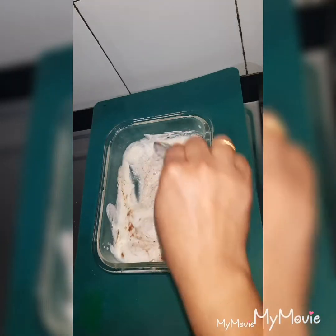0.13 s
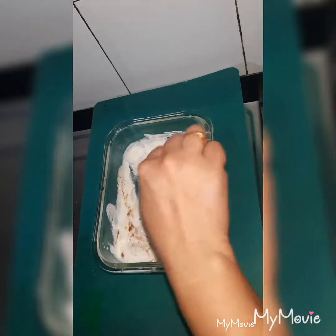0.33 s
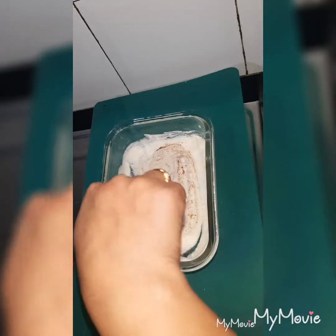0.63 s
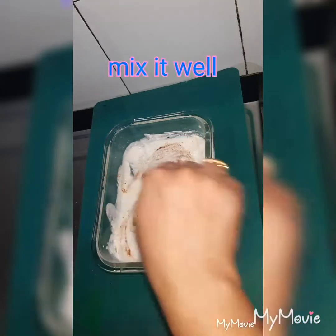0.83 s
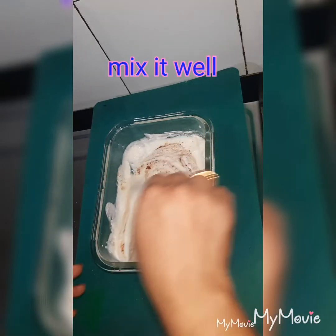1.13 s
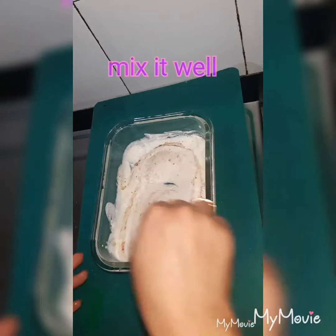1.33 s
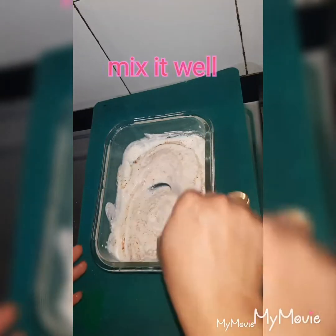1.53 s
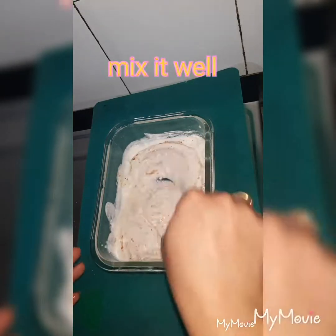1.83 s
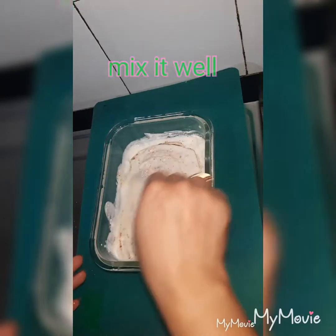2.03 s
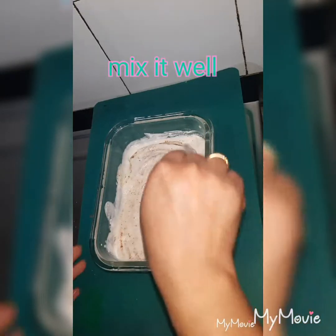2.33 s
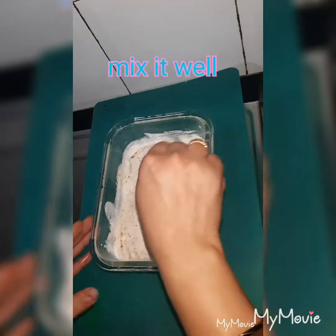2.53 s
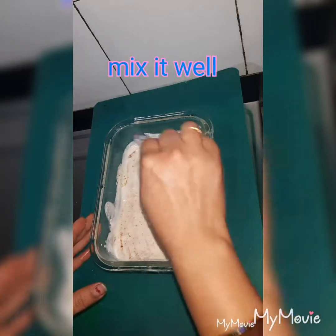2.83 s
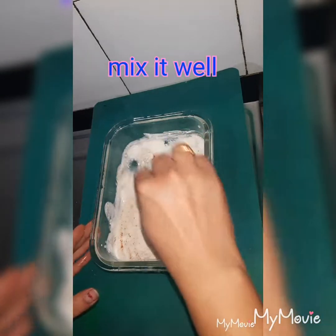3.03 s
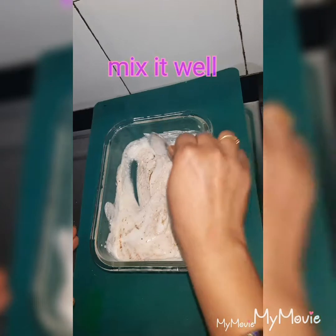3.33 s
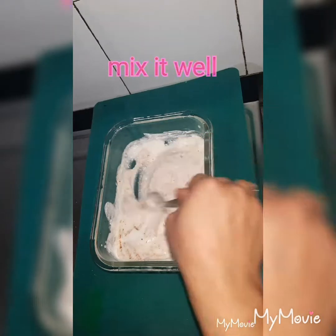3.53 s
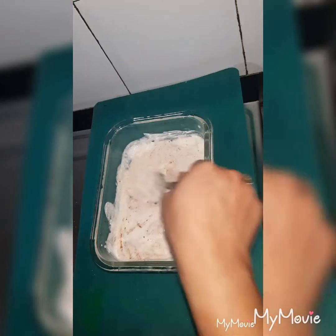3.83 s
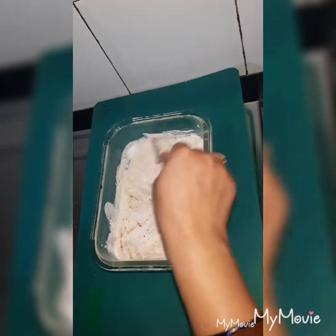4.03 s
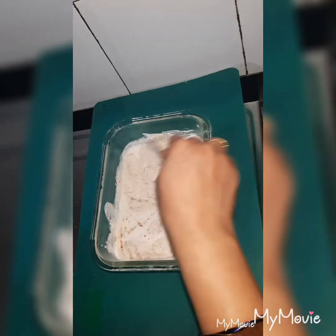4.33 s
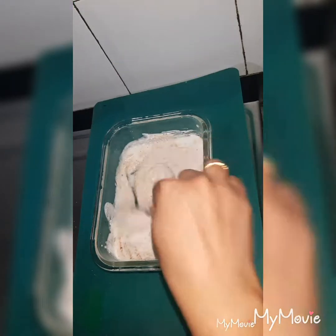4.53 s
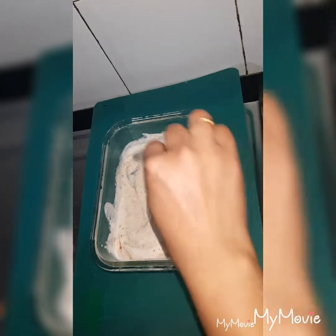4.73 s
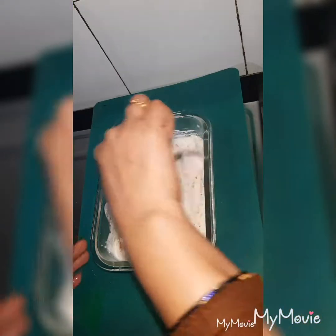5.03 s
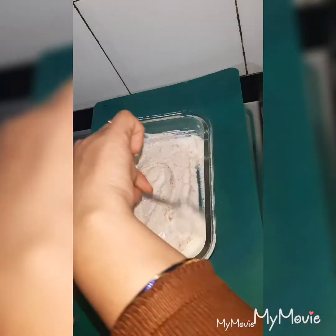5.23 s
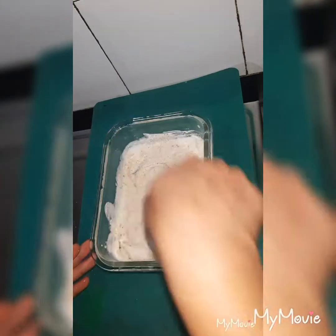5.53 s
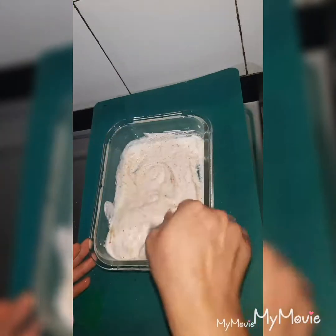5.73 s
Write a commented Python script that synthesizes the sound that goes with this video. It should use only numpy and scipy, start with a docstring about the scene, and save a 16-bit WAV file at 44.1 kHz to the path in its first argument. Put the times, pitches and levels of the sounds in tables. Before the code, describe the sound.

A metal spoon stirs thick yogurt in a glass dish, knocking its sides and base with short, damped clinks in a quiet small kitchen.

```python
"""In a small kitchen, a steel spoon stirs thick yogurt in a glass dish on a table and knocks its walls and base.
Each knock is a contact plus a few ms of chatter; it drives damped glass and steel modes and a bare crack.
The room answers with a short tail of decaying noise bands. Under it lies shaped noise: a low rumble that surges
into a thump at the end, a drone, faint hiss, soft grainy swells between and around the knocks, and wet smacks.
A sine makes a thin whine."""
import sys
import numpy as np
from scipy import signal
from scipy.fft import rfft, irfft
from scipy.io import wavfile
from scipy.ndimage import uniform_filter1d

SR = 44100
rng = np.random.default_rng(int(sys.argv[2]) if len(sys.argv) > 2 else 0)


def persist_wave(psi):
    """Save psi, clipped to +-1, as 16-bit WAV."""
    counts = np.round(np.clip(psi, -1, 1) * 32767).astype(np.int16)
    wavfile.write(sys.argv[1], SR, np.atleast_2d(counts).T)


N = 260094
RUN_IN = SR   # samples ahead of the scene, for knocks that still ring at its start

WALL, LIP, FLOOR, CORNER, FAR = range(5)   # struck spots of the dish
HISS_DB, WHINE_HZ, WHINE_DB = -85, 15625, -90
KITCHEN_DB, LATE_DB, LATE_STRETCH = -17, -17.5, 1.65   # tail; its fainter part, slower by the stretch
MOST_CYCLES = 85   # the yogurt damps the glass: t60 limit before the spot's freedom scales it
STRENGTH_SPREAD_DB, PITCH_SPREAD = 3.5, 0.007   # each knock meets the modes differently (pitch: ratio)
FLUTTER_DEPTH, FLUTTER_PER_S = 1.5, 120   # the moving spoon and yogurt shake every ring
FIRST_CONTACT, CHATTER = 0.76, 0.9   # shares of the push
CRACK_DB, CRACK_GROWS = 34.5, 0.18   # growth in dB per dB of knock level: weak touches are soft
STEEL_DB = 8
FAVOUR_Q = 6.94
BASE_HZ, THUMP_HZ, THUMP_DB = 810, 202, -1   # tops of the dish-base and table-top bands; thump re base
CREST_DB = 11.5   # nominal peak of a knock above its loudest 3 ms


def amp(db):
    """dB to gain."""
    return 10 ** (np.asarray(db) / 20)


def rms_one(x):
    """Scale to rms 1."""
    return x / np.sqrt(np.mean(x ** 2) + 1e-20)


def at_hz(points_hz, values, hz):
    """Straight lines on a log-frequency axis."""
    return np.interp(np.log(np.maximum(hz, 1)), np.log(points_hz), values)


def coloured(x, points_hz, db):
    """Shape a signal by a spectrum in dB."""
    bins_hz = np.fft.rfftfreq(len(x), 1 / SR)
    return irfft(rfft(x) * amp(at_hz(points_hz, db, bins_hz)), len(x))


def shaped_noise(spectrum):
    """Noise with a given spectrum, rms 1."""
    return rms_one(coloured(rng.standard_normal(N), *np.transpose(spectrum)))


def drift(knots_per_s):
    """Random wander: lines between normal knots of spread 1."""
    knots = int(N / SR * knots_per_s) + 2
    return np.interp(np.arange(N) / SR * knots_per_s, np.arange(knots), rng.standard_normal(knots))


def passed(x, hz, kind, order):
    """Butterworth filter."""
    return signal.sosfilt(signal.butter(order, hz, kind, fs=SR, output="sos"), x)


def lifted(x, hz, db):
    """Peaking filter: a resonance raised, or cut, by the given dB."""
    w, top = 2 * np.pi * hz / SR, amp(db / 2)
    wide = np.sin(w) / (2 * FAVOUR_Q)
    zeros = [1 + wide * top, -2 * np.cos(w), 1 - wide * top]
    poles = [1 + wide / top, -2 * np.cos(w), 1 - wide / top]
    return signal.lfilter(zeros, poles, x)


def rumble(t):
    """Low noise of wavering level, surging into a thump at the end."""
    # (frequency [Hz], relative density [dB])
    spectrum = [(15, -85.5), (25, -26.5), (48, -33), (63, -18), (91, -0.5), (156, -14), (266, -18),
                (328, -24.5), (362, -34.5), (440, -22.5), (598, -37.5), (775, -40), (1200, -58),
                (1560, -95.5), (2640, -120)]
    # (time [s], level [dB])
    level = [(0, -73.5), (.5, -70.5), (1.1, -65), (2.2, -62.5), (3.0, -62.5), (3.3, -67), (3.9, -60.5),
             (4.5, -66), (5.3, -65.5), (5.6, -67.5), (5.84, -68), (5.9, -43)]
    return amp(np.interp(t, *np.transpose(level)) + 2.5 * drift(14.0)) * shaped_noise(spectrum)


def drone(t):
    """Faint noise peaked near 780 Hz, of wavering level."""
    # (frequency [Hz], relative density [dB])
    spectrum = [(400, -33.5), (600, -19), (780, 6.5), (900, -4.5), (1200, -20)]
    # (time [s], level [dB])
    level = [(0, -110), (.6, -91.5), (1.5, -80.5), (2.2, -74), (2.9, -77.5), (3.2, -81.5), (3.7, -80),
             (4.2, -79), (4.5, -68), (4.8, -83), (5.9, -86)]
    return amp(np.interp(t, *np.transpose(level)) + 3.0 * drift(6.0)) * shaped_noise(spectrum)


def hiss():
    """Steady shaped noise."""
    # (frequency [Hz], relative density [dB])
    spectrum = [(500, -5.5), (1000, -1), (2000, -11), (4000, -12), (7000, -14), (11000, -15.5),
                (15300, -9.5), (15800, -40.5)]
    return amp(HISS_DB) * shaped_noise(spectrum)


def whine(t):
    """Thin high sine, its level drifting slightly."""
    return amp(WHINE_DB + 3.0 * drift(3.0)) * np.sin(2 * np.pi * WHINE_HZ * t)


def grainy_swells(t):
    """Soft hiss swelling between and around knocks: noise under bell curves, grainy by fast level drift."""
    # (frequency [Hz], relative density [dB])
    spectrum = [(530, -41.5), (900, -12.5), (1800, -3.5), (2900, -5), (4700, -7), (6400, -17),
                (9000, -14.5), (12000, -19), (15500, -20)]
    # (middle [s], full width at 1/e [s], level [dB])
    swell_table = [(.92, 0.36, -78), (1.427, 0.39, -72), (1.9, 0.28, -70), (2.452, 0.19, -71),
                   (2.853, 0.75, -72), (3.45, .3, -80), (4.262, 0.25, -88), (4.78, .3, -74),
                   (5.143, 0.13, -73), (5.42, .25, -72.5)]
    swells = sum(amp(db) * np.exp(-(2 * (t - mid_s) / length_s) ** 2) for mid_s, length_s, db in swell_table)
    return swells * amp(1.9 * drift(210.0)) * shaped_noise(spectrum)


def background():
    """Sum of the sounds that bypass the room tail."""
    t = np.arange(N) / SR
    return rumble(t) + drone(t) + grainy_swells(t) + hiss() + whine(t)


def kitchen(x):
    """Dense reflections: noise that swells over 2 ms and dies band by band."""
    # (frequency [Hz], t60 of the main part [s], relative level [dB])
    decays = [(250, 0.23, -10), (575, 0.24, -14.5), (1500, 0.2, -17), (3750, 0.23, -19), (8000, 0.23, -22),
              (11000, .2, -15.5), (15000, 0.057, -11.5)]
    t = np.arange(int(0.7 * SR)) / SR
    hz, t60_s, db = np.transpose(decays)
    tail = np.zeros(len(t))
    edges_hz = 150 * 2 ** np.arange(0, 7.1, 0.5)
    for low, high in zip(edges_hz, edges_hz[1:]):
        mid = np.sqrt(low * high)
        band = passed(rng.standard_normal(len(t)), [low, high], "band", order=2)
        decay_db = -60 * t / at_hz(hz, t60_s, mid)
        decay = amp(decay_db) + amp(LATE_DB + decay_db / LATE_STRETCH)
        tail += band * amp(at_hz(hz, db, mid)) * decay
    tail *= np.minimum(t / 0.002, 1) * amp(KITCHEN_DB)
    return signal.fftconvolve(x, tail)[:len(x)]


def smacks():
    """Soft wet smacks and grit under the spoon: short grainy noise puffs, each in its own band."""
    # (time [s], level before envelope [dB], nominal centre [Hz], nominal width [octaves], time scale [s])
    puffs = [(1.935, -46.5, 8000, 2.1, 0.007), (2.489, -60.5, 5940, 1.2, 0.0068),
             (2.513, -60.5, 4800, 0.52, 0.016), (2.538, -60, 5400, 1.2, 0.008),
             (2.572, -57, 1000, .3, 0.0097), (4.672, -60, 4960, 0.98, 0.012),
             (4.816, -63.5, 4500, 2.1, 0.023), (5.136, -76, 7500, 0.89, 0.016),
             (5.161, -66.5, 1500, 0.25, 0.0096), (5.165, -69, 8000, .5, 0.012),
             (5.453, -63, 9570, 0.75, 0.01)]
    out = np.zeros(N)
    for (s, db, hz, octaves, length_s), draw in zip(puffs, rng.standard_normal((len(puffs), 4096))):
        t = np.arange(4096) / SR / length_s
        edges_hz = np.minimum(hz * 2 ** (octaves * np.array([-0.5, 0.5])), 16000)
        band = passed(draw * np.abs(draw), edges_hz, "band", order=2)
        envelope = np.minimum(6.0 * t, 1) * np.exp(-1.5 * t)
        at = round(s * SR)
        out[at:at + 4096] += amp(db) * rms_one(band) * envelope
    return out


def rings(modes, db, t, freedom, draw):
    """Sum of damped sines, each fluttering in strength; freedom scales t60."""
    hz, level_db, t60_s = modes
    knots = draw[:len(hz) * 64].reshape(len(hz), 64)
    wander = np.array([np.interp(t * FLUTTER_PER_S, np.arange(64) + 1, k, left=0) for k in knots])
    decay = amp(-60 * t / (t60_s * freedom)[:, None])
    waves = (1 + FLUTTER_DEPTH * wander) * decay * np.sin(2 * np.pi * hz[:, None] * t)
    return amp(level_db + db) @ waves


def glass(t, colour_hz, colour_db, freedom, draw):
    """Yogurt-damped modes of the dish; the uneven load shifts their pitches."""
    # (frequency [Hz], level [dB], t60 before limit and freedom [s])
    dish_modes = [(386.4, -12, 0.17), (634.7, -16, 0.29), (838, -22, 0.1), (1120, -14, 0.028),
                  (1290, -10.5, 0.038), (1500, -7.5, 0.013), (1928, -27.5, 0.064), (1843.5, -21.5, 0.21),
                  (2007, -7.5, 0.055), (2007, -12.5, 0.04), (2281, -8, 0.27), (2414, -18.5, 0.083),
                  (2724, -10, 0.055), (2900, -6.5, 0.12), (3190, -10.5, 0.054), (3616, -15.5, 0.21),
                  (3880, -19, 0.15), (4140, -13, 0.012), (4620, -9.5, 0.013), (4810, -8.5, 0.11),
                  (5260, -7.5, 0.06), (6050, -17.5, 0.09), (7060, -24.5, 0.017), (8200, -5.5, 0.075),
                  (8860, -13, .025), (9400, -16.5, 0.013), (9880, -18.5, 0.053), (12100, -30, 0.0067),
                  (13700, -22, 0.018)]
    hz, db, t60_s = np.transpose(dish_modes)
    count = len(hz)
    spot_db = at_hz(colour_hz, colour_db, hz) + STRENGTH_SPREAD_DB * draw[:count]
    loaded_hz = hz * (1 + PITCH_SPREAD * draw[count:2 * count])
    modes = loaded_hz, db, np.minimum(t60_s, MOST_CYCLES / hz)
    return rings(modes, spot_db, t, np.clip(freedom, 0.1, 1.3), draw[100:])


def steel_ring(t, colour_hz, colour_db, steel_db, draw):
    """Faint modes of the spoon."""
    # (frequency [Hz], relative level [dB], t60 before freedom 0.8 [s])
    steel_modes = [(629, -30, .3), (1265, -38, .25), (1865, -37, .3), (1985, -35, .3), (2252, -31, .25),
                   (3545, -39, .55), (4705, -40, .3)]
    modes = np.transpose(steel_modes)
    return rings(modes, at_hz(colour_hz, colour_db, modes[0]) + steel_db, t, 0.8, draw[2100:])


def bare_crack(chatter, colour_hz, colour_db):
    """Contact noise without modes: chatter through a short spectral filter."""
    # (frequency [Hz], relative level [dB])
    spectrum = [(400, -43), (1000, -8), (2500, -3), (5000, -4), (9000, -16.5), (15000, -25.5)]
    hz, db = np.transpose(spectrum)
    gains = amp(2 * (db + at_hz(colour_hz, colour_db, hz)))   # doubled dB: minimum_phase halves it
    linear = signal.firwin2(255, np.r_[0, hz, SR / 2], np.r_[0, gains, 0] + 1e-6, fs=SR)
    return signal.fftconvolve(chatter, signal.minimum_phase(linear))


def knock(force_db, base_db, colour_db, chatter_s, freedom, steel_db, favoured, draw):
    """A sharp contact and tiny chatter drive the modes and a crack; the loudest 3 ms get rms 1."""
    # frequencies where wall, reference, rim, edge and tick levels act [Hz]
    colour_hz = [1250, 2100, 3600, 5000, 9500]
    t = np.arange(int(0.5 * SR)) / SR
    body = glass(t, colour_hz, colour_db, freedom, draw)
    steel = steel_ring(t, colour_hz, colour_db, steel_db, draw)

    short = t[:1024]
    envelope = np.exp(-short / max(chatter_s, 1e-4)) * np.minimum(short / 0.0026, 1)
    chatter = draw[-1024:] * np.abs(draw[-1024:]) * envelope
    chatter /= np.sqrt(np.sum(chatter ** 2))
    blow = CHATTER * chatter + FIRST_CONTACT * (np.arange(len(short)) == 40)

    sound = signal.fftconvolve(blow, body)
    crack = bare_crack(chatter, colour_hz, colour_db)
    sound[:len(crack)] += amp(CRACK_DB + CRACK_GROWS * force_db) * crack
    for spot_hz, lift_db in favoured:
        sound = lifted(sound, spot_hz, lift_db)
    sound += amp(STEEL_DB) * signal.fftconvolve(blow, steel)

    base = passed(sound, [350, BASE_HZ], "band", order=3)
    base += amp(THUMP_DB) * passed(sound, [80, THUMP_HZ], "band", order=2)
    sound = passed(sound, BASE_HZ, "high", order=4) + amp(base_db) * base
    return sound / np.sqrt(np.max(uniform_filter1d(sound ** 2, size=128)))


def spoon():
    """All knocks in place, dealt in turn to six paths into the room; smacks join the first."""
    # (time [s], nominal peak [dB], spot, weight added to base and wall [dB],
    #  brightness added to rim, edge and tick [dB], clarity scaling the favoured lifts,
    #  own note [Hz], note lift [dB], steel ring before STEEL_DB [dB])
    knocks = [(-0.1, -23.5, WALL, -4, -5, 0.53, 2230, 10.5, -12),
              (0.2787, -27, WALL, 1, -0.5, 0.81, 3840, 10, 7),
              (0.3515, -22.5, WALL, 3.5, -3, 0.95, 1935, 9, -2.5),
              (0.7284, -20, WALL, 3.5, 2, 2.03, 8000, 16.5, 6),
              (0.7637, -6.5, LIP, 1.5, -0.5, 0.43, 1130, -2, -14.5),
              (0.8091, -21.5, WALL, -6.5, -0.5, 1.14, 2310, 9.5, 2),
              (1.2339, -10, LIP, 4.5, 5, 1.1, 2613, 12.5, 4),
              (1.3103, -12.5, LIP, -0.5, -5, 1.24, 2250, 2.5, 1),
              (1.5648, -45.5, FAR, 2, -6, .8, 1040, 13.5, 6),
              (1.697, -5.5, LIP, -1.5, -5.5, 0.18, 5260, 10, 5.5),
              (1.8126, -17, FLOOR, 1.5, -3, 1.5, 2100, 2.5, -15),
              (1.9473, -17.5, FAR, -2.5, -5.5, 0.4, 3360, 6, -6),
              (2.1002, -7.5, FLOOR, -1, 1, 1.22, 2130, 9, -16),
              (2.2412, -27.5, FAR, -5.5, -4, 0.25, 2330, 15, -13),
              (2.305, -39.5, FAR, -3, -1, .8, 990, 12, -15),
              (2.3702, -16, FLOOR, -5.5, 0.5, 1.54, 4810, 5.5, -17),
              (2.5945, -17.5, FAR, 2.5, 3.5, 2.2, 1750, 12.5, 4.5),
              (2.6831, -13, CORNER, -2, -4, 0.87, 2200, 3.5, -28),
              (2.829, -33.5, CORNER, 3, 8, 2.1, 1900, 1, -2),
              (2.9026, -38.5, FAR, 4.5, -5, 1.4, 905, 12.5, -9),
              (2.9904, -15.5, CORNER, -0.5, -1.5, 1.1, 2900, 10, -13),
              (3.3539, -19.5, WALL, 0.5, 2, 1, 2720, 10, -8.5),
              (3.4491, -36.5, FLOOR, 7.5, -5.5, 0.32, 2790, 9, 0),
              (3.8575, -5.5, LIP, 2.5, -3, 1.9, 752, 9, 8.5),
              (4.2495, -45.5, FAR, -11, 23.5, 0.24, 4490, 5, -4),
              (4.3317, -14.5, WALL, 4.5, 11.5, 0.76, 3520, 7, -2.5),
              (4.5464, -28, FAR, -0.5, -0.5, 1.07, 1560, 12.5, -4),
              (4.7424, -34, FLOOR, 4, 9, 1.4, 1454, 9.5, -11),
              (4.8984, -5, FLOOR, -2, 6, 0.9, 2800, 11.5, 2.5),
              (4.998, -17.5, FLOOR, 3.5, -0.5, 0.29, 1984, 16, -17),
              (5.1036, -44, FLOOR, 3, -5, 1.0, 2210, 4, -3),
              (5.2354, -27.5, FAR, -5, -2, 0.74, 2350, 6.5, -12),
              (5.3025, -4, LIP, 0, -4, .6, 4960, 10.5, -13),
              (5.3413, -15.5, WALL, -0.5, 0.5, 1, 4900, -3, -2.5),
              (5.7875, -14, WALL, 4, -1, 1.1, 3750, 7.5, -3.5),
              (5.8704, -3.5, LIP, 4, 15.5, 1.23, 2275, 4.5, 9),
              (5.8844, -2, LIP, 0, 13, 2.7, 2245, 29, -15)]
    # per spot: (base [dB], wall [dB], rim [dB], edge [dB], tick [dB], chatter decay [s], freedom to ring)
    spots = [(-6, -0.5, 2, 1.5, -2.5, 0.0072, 0.78), (-9.5, -3.5, -1.5, 1.5, 1.5, .004, .95),
             (-10, -6, -16, -10, -6.5, 0.0033, 0.18), (-21.5, -2.5, -30.5, -10, -3, 0.0053, 0.33),
             (-5.5, 1.5, -4.5, -2, 2, 0.0073, 0.28)]
    # resonances per spot: (frequency [Hz], lift before clarity [dB])
    spot_resonances = [
        [(1030, 6), (1900, 4), (3780, 8.5), (4600, 4)],
        [(1265, 4.5), (1900, 4.5), (3560, 12.5), (4700, 0)],
        [(1540, 8.5), (2120, 8.5), (2900, -1.5), (4750, 3.5)],
        [(1490, 8), (1800, 3.5), (3200, 9), (4980, 9.5)],
        [(1060, 6), (2030, 8), (3000, 4.5), (5000, 5.5)],
    ]
    out = np.zeros((6, N + 2 * SR))
    draws = rng.standard_normal((len(knocks), 3600))
    for k, (s, db, spot, weight_db, bright_db, clarity, note_hz, note_db, ring_db) in enumerate(knocks):
        base, wall, rim, edge, tick, chatter_s, freedom = spots[spot]
        colour_db = [wall + weight_db, 0, rim + bright_db, edge + bright_db, tick + bright_db]
        favoured = [(hz, clarity * lift_db) for hz, lift_db in spot_resonances[spot]]
        favoured.append((note_hz, note_db))
        sound = knock(db, base + weight_db, colour_db, chatter_s, freedom, ring_db, favoured, draws[k])
        at = round((s - 0.001) * SR + RUN_IN)   # the first contact lies about 1 ms into the knock
        out[k % 6, at:at + len(sound)] += amp(db - CREST_DB) * sound
    out[0, RUN_IN:RUN_IN + N] += smacks()
    return out[:, :N + RUN_IN]


def scene():
    """Spoon paths, each with its own reflections, over the background."""
    in_room = sum(path + kitchen(path) for path in spoon())
    return (in_room[RUN_IN:] + background())[None]


def record(dry):
    """Steep low-pass, stopband from 16.9 kHz."""
    return signal.sosfilt(signal.cheby2(20, 80, 16900, fs=SR, output="sos"), dry)


dry = scene()
out = record(dry)
persist_wave(out)
```